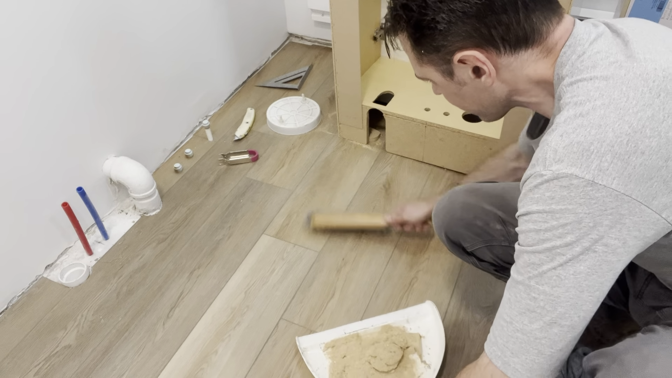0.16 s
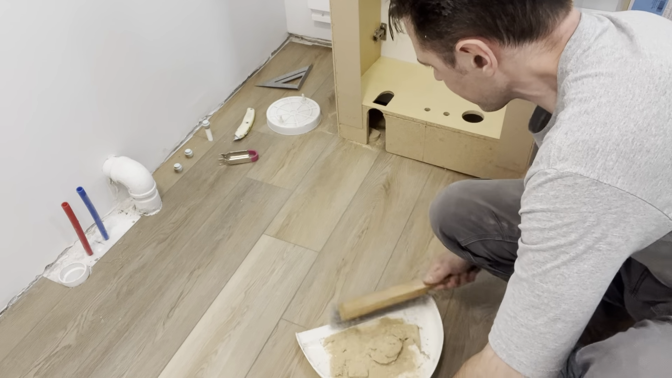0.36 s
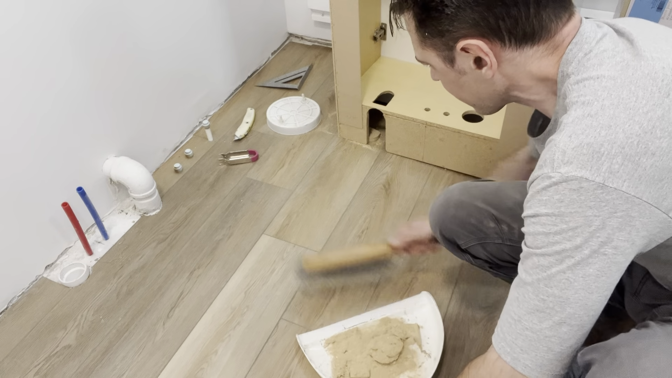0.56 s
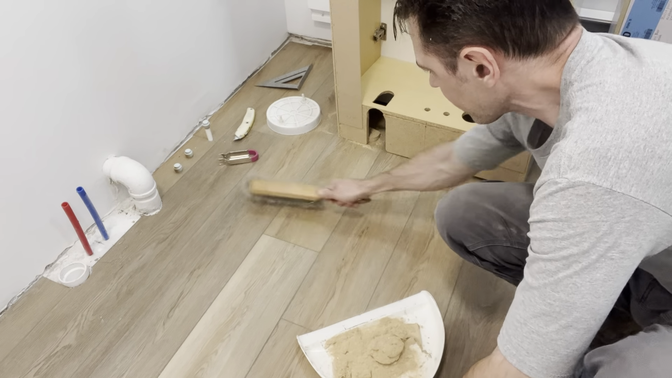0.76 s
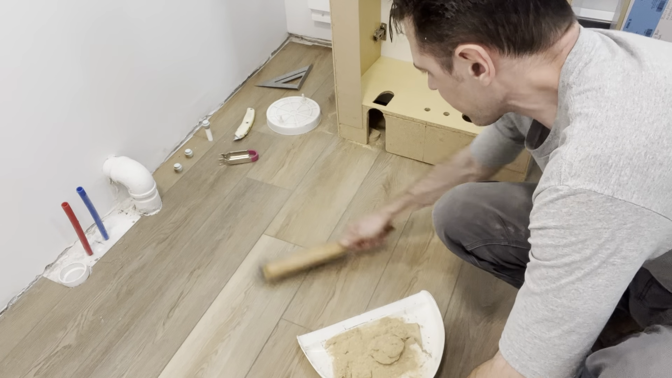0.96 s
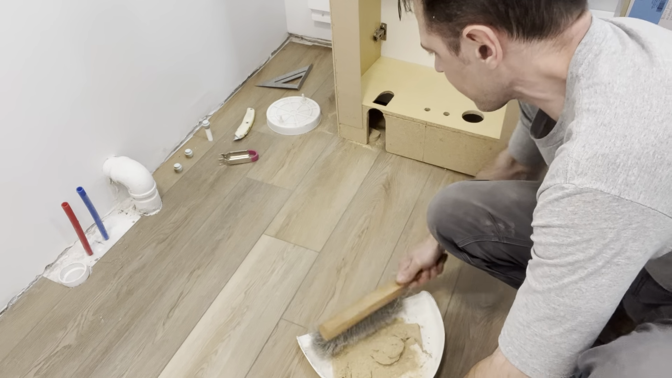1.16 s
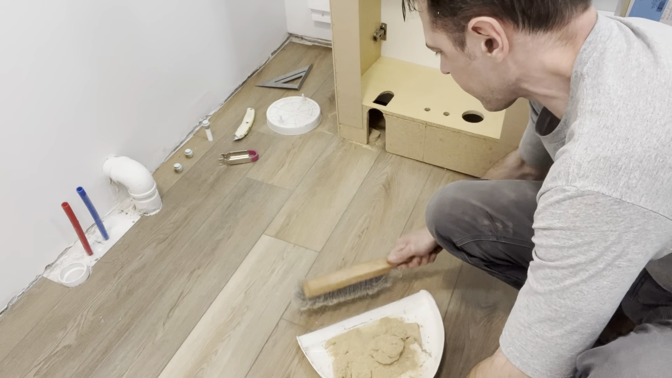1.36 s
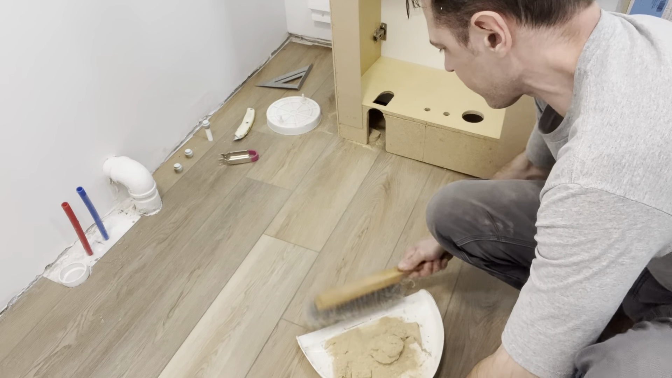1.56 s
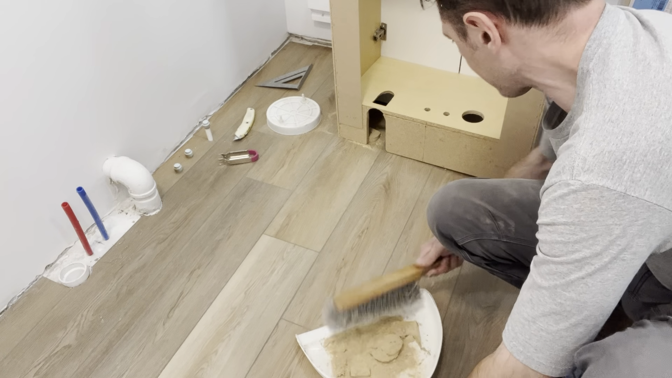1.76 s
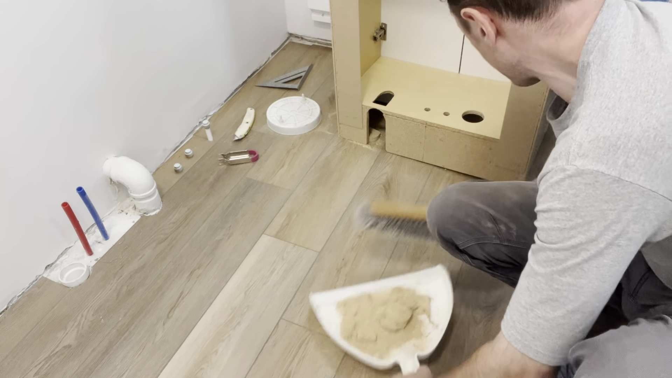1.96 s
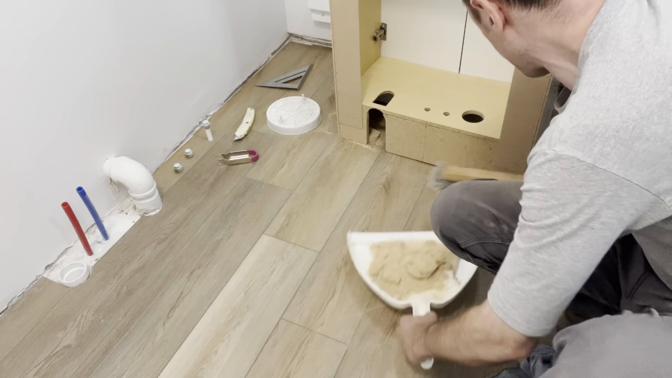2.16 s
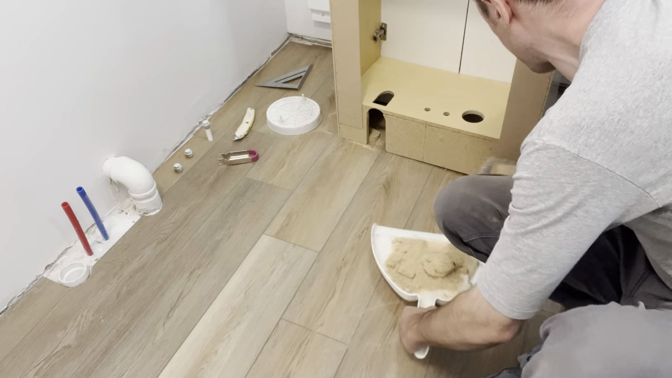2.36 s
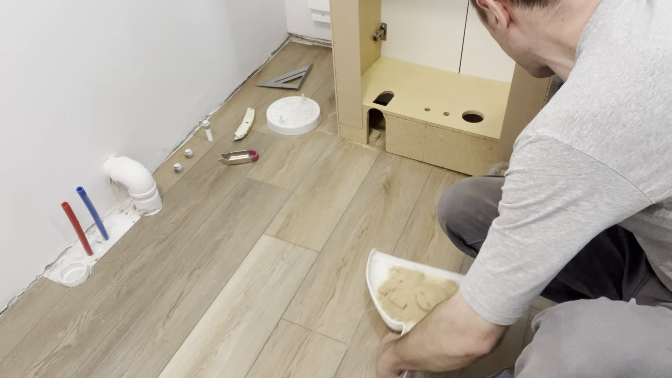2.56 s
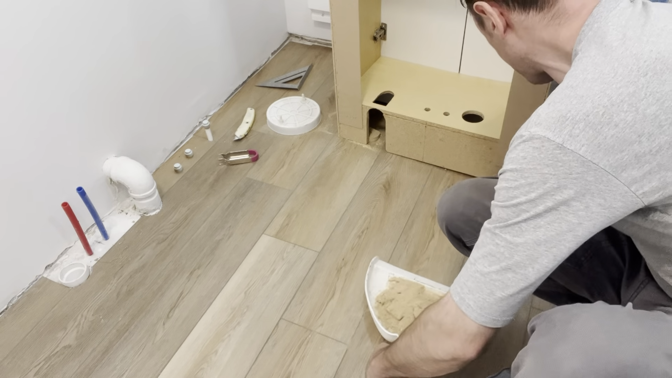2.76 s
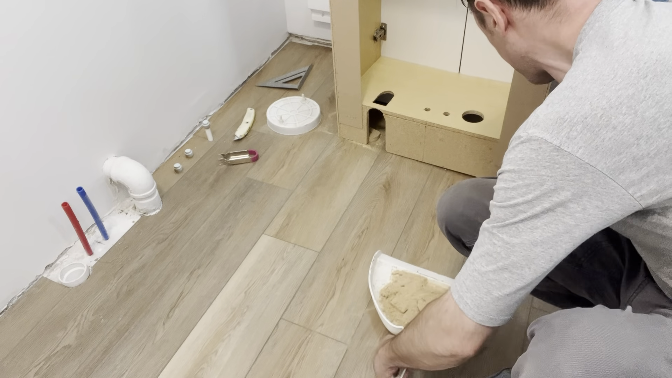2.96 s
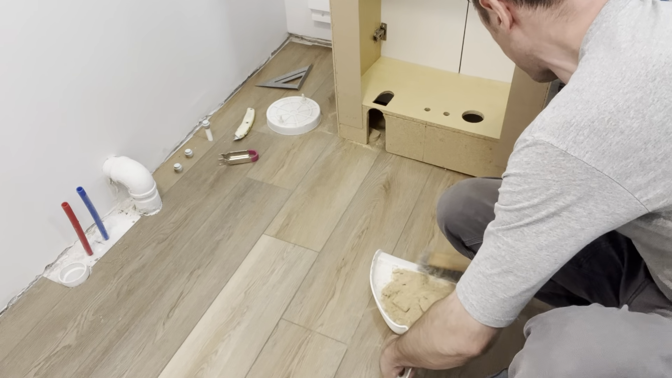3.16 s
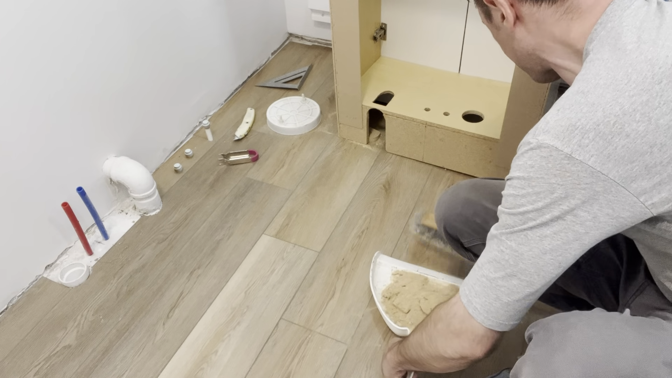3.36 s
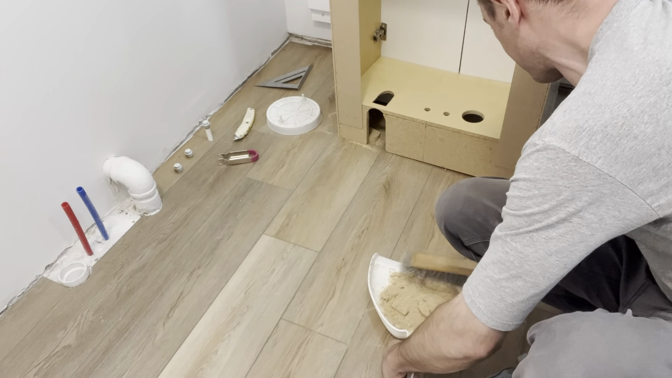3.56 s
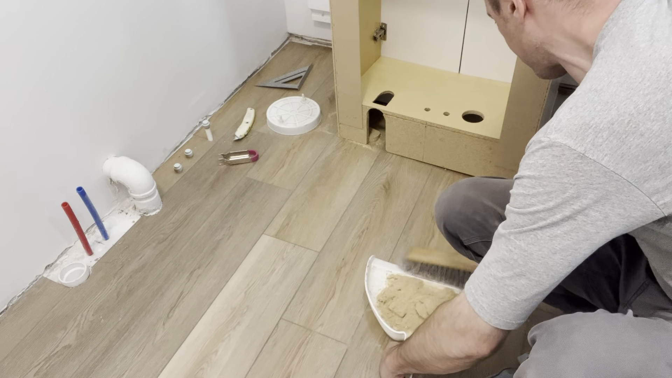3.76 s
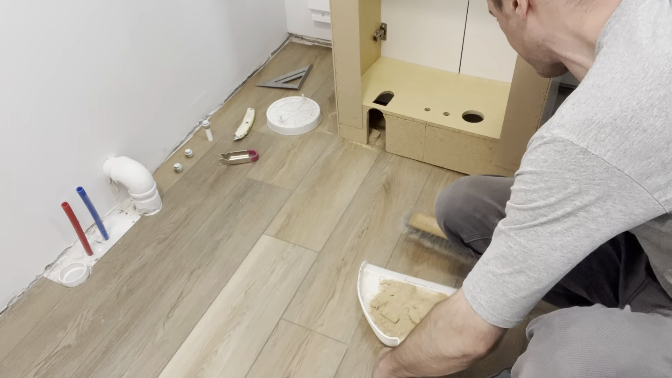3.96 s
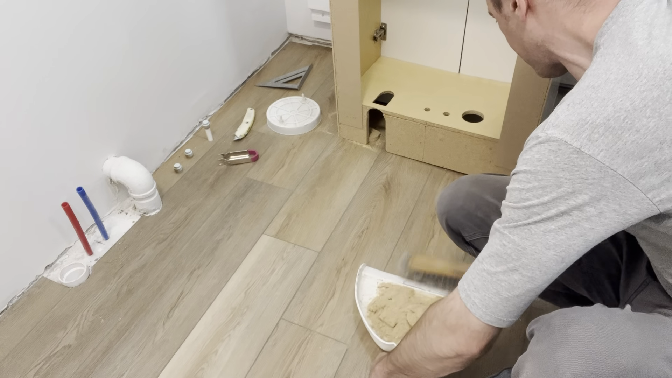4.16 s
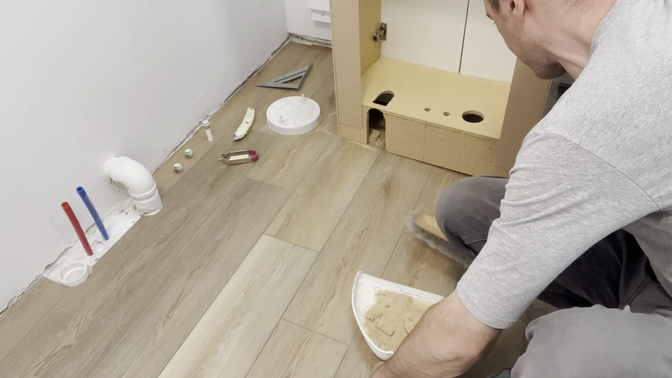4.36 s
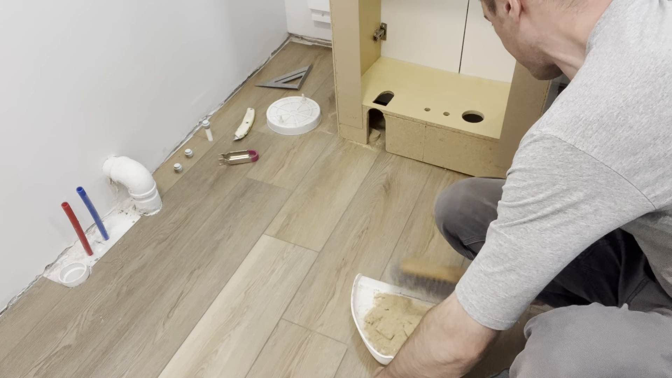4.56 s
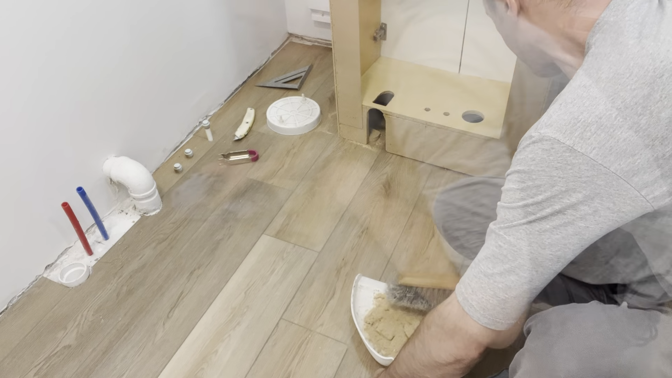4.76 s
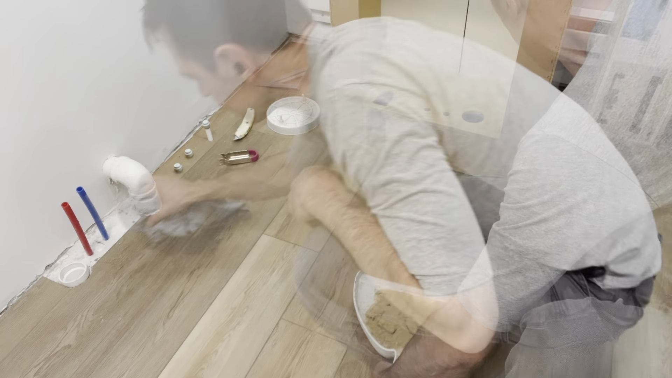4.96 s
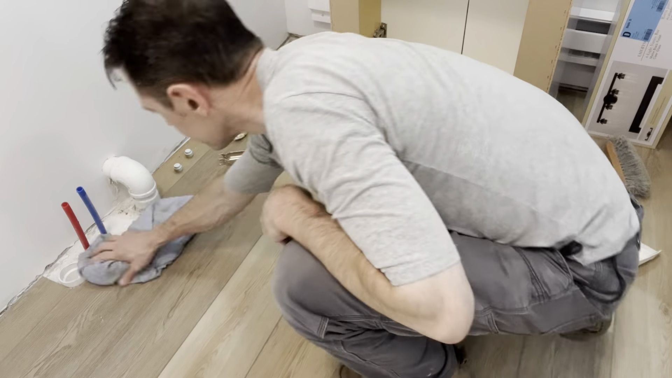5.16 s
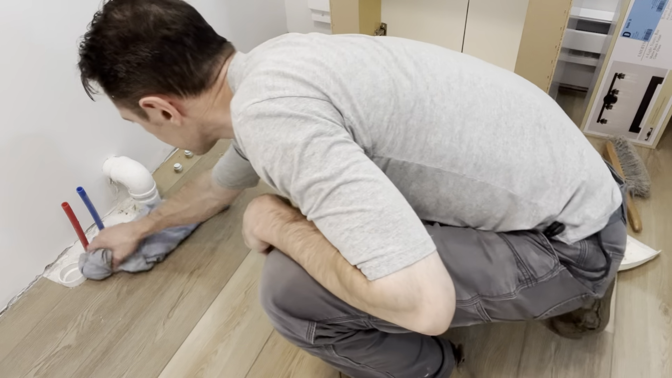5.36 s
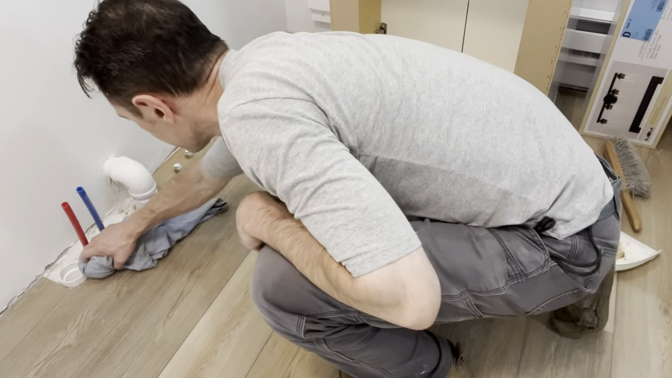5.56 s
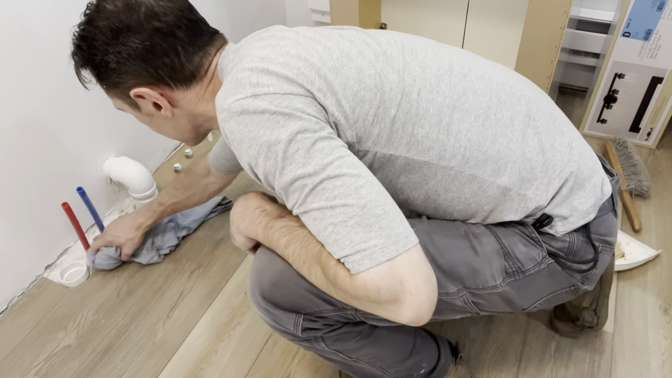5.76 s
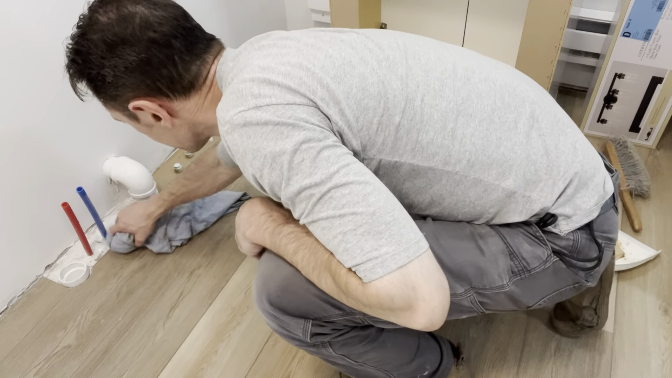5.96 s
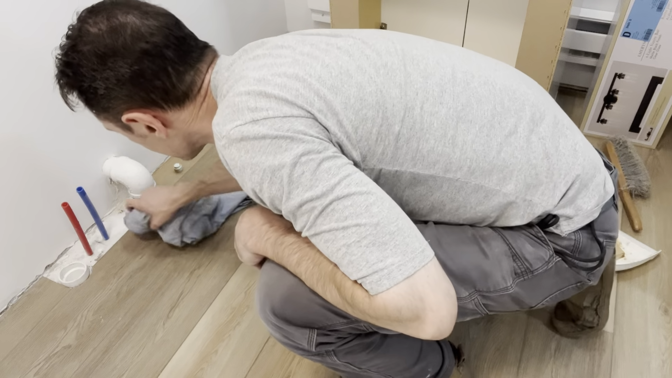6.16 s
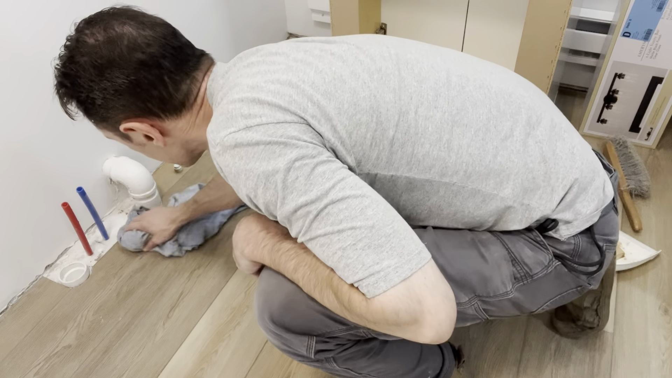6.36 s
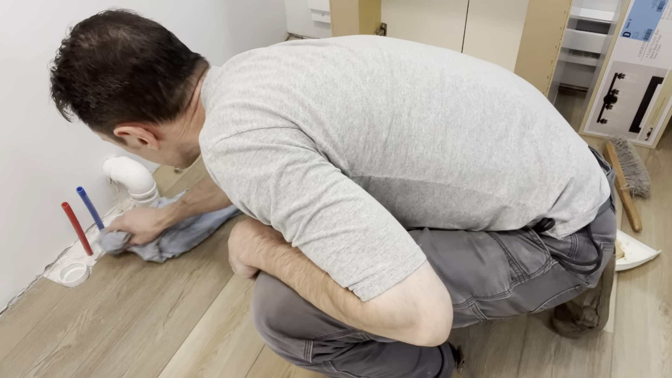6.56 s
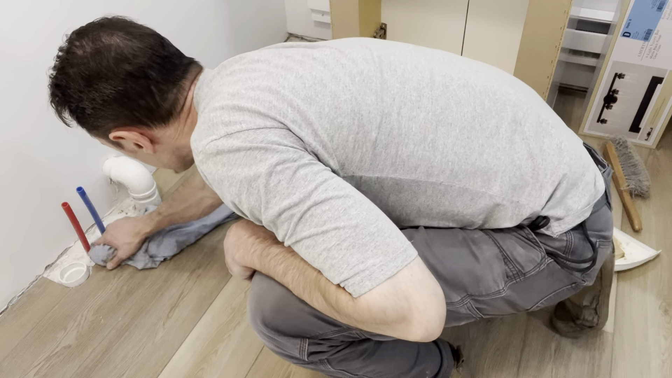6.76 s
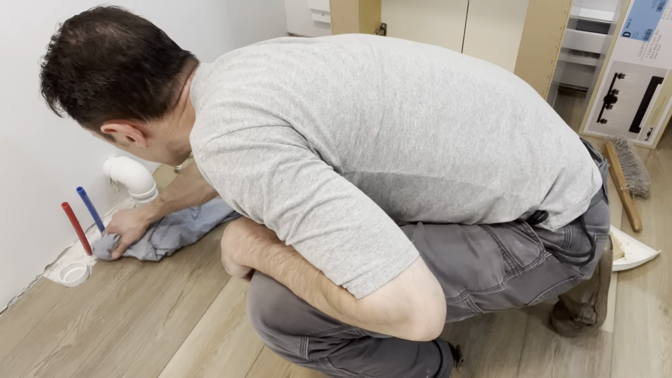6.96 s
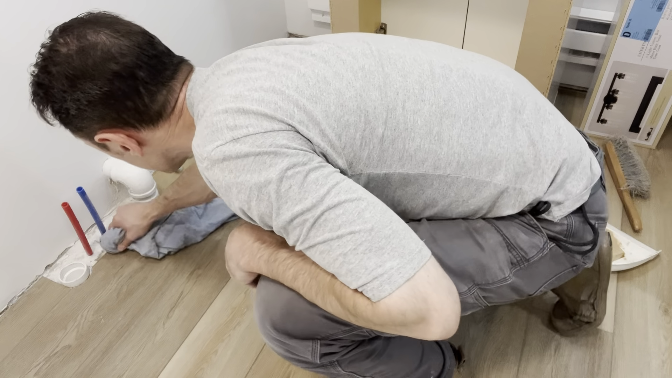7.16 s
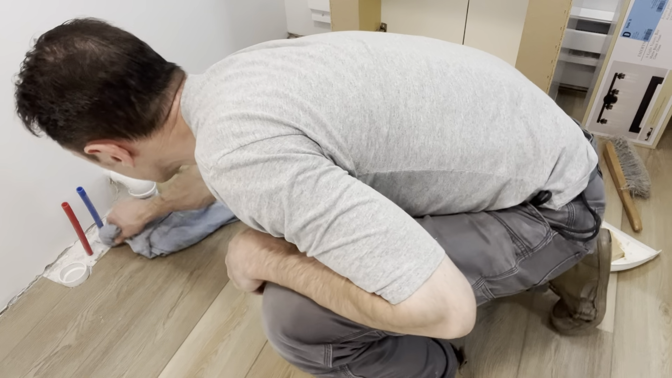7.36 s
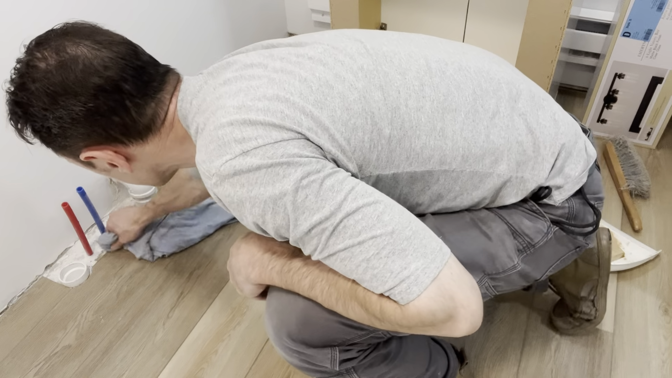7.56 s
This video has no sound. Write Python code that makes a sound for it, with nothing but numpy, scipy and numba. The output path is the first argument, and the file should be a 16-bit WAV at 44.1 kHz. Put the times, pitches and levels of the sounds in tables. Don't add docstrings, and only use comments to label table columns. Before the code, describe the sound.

In a small bare room, a bristle brush sweeps sawdust over laminate toward a plastic dustpan, with long hissing strokes, ringing scrapes and light taps. After a quieter gap the strokes turn short and brisk, with one hard knock and some duller drops. Then knees shuffle and a cloth wipes much more softly, finally rubbing a hollow drain pipe. Close stereo phone pickup, wide texture, faint room hiss.

```python
import sys
import numpy as np
from scipy import signal
from scipy.fft import rfft, irfft
from scipy.io import wavfile
from scipy.ndimage import uniform_filter1d
from numba import njit

SR = 44100
rng = np.random.default_rng(int(sys.argv[2]) if len(sys.argv) > 2 else 0)


def gain_from_db(level_db):
    decades = np.asarray(level_db, float) / 20
    return 10 ** decades


def bounce(signal):
    frames = np.transpose(np.atleast_2d(signal))
    limited = np.clip(frames, -1, 1)
    pcm = np.round(limited * 32767).astype(np.int16)
    wavfile.write(sys.argv[1], SR, pcm)


N = 339570
FREQ = np.arange(N // 2 + 1) * SR / N + 1e-3
TICK = np.arange(N // 20 + 2) * 20 / SR

# land_s, lift_s, peak_db, landing_db, brightness_db
BRUSH_STROKES = [(-.01, 0.354, -45.5, -54, -5), (0.783, 0.997, -48, -58, -3), (0.98, 1.112, -47, -57, -2.5),
                 (1.15, 1.248, -67.5, -63, -8), (1.28, 1.367, -67, -76, -14), (1.406, 1.47, -53, -56, -5.5),
                 (1.624, 1.64, -49.5, -58, -8), (1.718, 1.777, -62.5, -75, -11),
                 (1.96, 2.298, -87.5, -100, -13), (2.629, 2.67, -55.5, -69, -3.5),
                 (2.637, 2.967, -50.5, -63.5, -6), (2.947, 3.064, -51, -56.5, -4.5),
                 (3.062, 3.154, -47.5, -57, -6), (3.26, 3.413, -61.5, -78, -7.5),
                 (3.467, 3.558, -51.5, -57, -5.5), (3.66, 3.747, -56, -70, -8),
                 (3.74, 3.768, -44.5, -42, -12.5), (3.803, 4.024, -52.5, -53.5, -7.5),
                 (4.04, 4.18, -53, -64.5, -2.5), (4.154, 4.315, -51.5, -53.5, -4.5),
                 (4.28, 4.376, -50.5, -56, -6.5), (4.403, 4.444, -51.5, -57, -4),
                 (4.458, 4.491, -47.5, -43.5, -6), (4.682, 4.705, -48.5, -52, -3.5),
                 (4.78, 4.85, -70, -72, -12), (4.858, 4.955, -70.5, -74, -11)]
# land_s, lift_s, peak_db, landing_db, brightness_db
CLOTH_WIPES = [(4.95, 5.09, -74.5, -83, -9), (5.093, 5.166, -65.5, -80, -3.5),
               (5.283, 5.383, -69, -80, -8.5), (5.393, 5.446, -76.5, -74, -3.5),
               (5.566, 5.673, -72.5, -78, -14.5), (5.674, 5.792, -57.5, -68.5, -6),
               (5.802, 5.902, -57, -59, -7.5), (5.88, 5.954, -65.5, -72, -2.5),
               (6.247, 6.273, -67.5, -72, -4.5), (6.3, 6.522, -73.5, -81, -8),
               (6.595, 6.664, -67.5, -73, -5), (6.8, 7.097, -62.5, -86.5, -6), (7.17, 7.3, -65, -69, -7),
               (7.33, 7.45, -69.5, -73, -4), (7.52, 7.604, -62, -81, -4.5)]
# freq_hz, density_db_per_hz
BRISTLE_SPECTRUM = [(300, -19), (600, -6.5), (900, -3), (2000, 1.5), (3500, 1), (5200, -2), (7300, -2.5),
                    (8600, -7.5), (10000, -11.5), (11800, -16.5), (13000, -15.5), (15500, -20.5)]
ROOM_FALL_DB_S, TOP_FALL_DB_S = 135, 169
CLOTH_FALL_DB_S, CLOTH_TOP_FALL_DB_S, PIPE_FALL_DB_S = 85.5, 116, 73
LANDING_S, CLOTH_LANDING_S = 0.0088, 0.024

# land_s, lift_s, peak_db, landing_db, ring_hz
RIM_SCRAPES = [(-.01, .15, -49.5, -43, 1250), (0.159, 0.306, -43.5, -46.5, 1060),
               (.85, 1.03, -65, -82, 1120), (1.315, 1.36, -58.5, -66, 1190), (1.423, 1.6, -75, -52, 1440),
               (1.618, 1.63, -44.5, -69, 1460), (1.73, 1.764, -53.5, -65, 910),
               (1.86, 1.91, -96, -80, 1130), (2.534, 2.656, -68, -86, 864),
               (2.643, 2.686, -45.5, -45, 1000), (2.713, 2.804, -41.5, -57, 1090),
               (2.823, 2.89, -41.5, -46, 1120), (2.87, 3.013, -42.5, -42.5, 1080),
               (3.032, 3.183, -49.5, -49, 980), (3.302, 3.4, -54.5, -62.5, 1300),
               (3.456, 3.56, -54, -54, 1300), (3.664, 3.763, -49, -62, 1300), (3.738, 3.78, -41, -56, 1120),
               (3.805, 3.997, -46.5, -41.5, 1170), (4.023, 4.083, -49, -54, 1210),
               (4.156, 4.34, -48, -57, 1190), (4.397, 4.495, -52.5, -56, 740),
               (4.681, 4.715, -57, -41, 730), (4.85, 4.885, -51.5, -65, 1040),
               (4.91, 4.946, -56.5, -57, 566)]
# land_s, lift_s, peak_db, landing_db, ring_hz
SHUFFLES = [
    (5.08, 5.132, -57.5, -68, 650),
    (5.152, 5.22, -65, -64, 420),
    (5.747, 5.868, -55.5, -76, 810),
    (6.23, 6.282, -59.5, -72, 700),
    (7.202, 7.4, -63, -72, 620),
    (7.412, 7.437, -57, -37, 694),
    (7.556, 7.625, -60, -65, 810),
]
# freq_hz, width_hz, level_db
PAN_MODES = [(484, 34, -2.5), (565, 22, 1), (620, 68, -13), (696.5, 26, -3), (802, 20, 1), (872, 7.3, 1),
             (933.6, 21.5, -1.5), (1057, 39, -3.5), (1103, 8, 0.5), (1199, 86, -1.5), (1250, 27, -3),
             (1300, 8.3, 3.5), (1370, 92, -6.5), (1420, 8.8, 3), (1503, 23, 0), (1600, 21, -1.5),
             (1736, 41, -4.5), (2000, 31, -12), (2310, 84, -2), (2560, 90, -2), (2700, 51, -3),
             (3180, 180, -2)]
CLOTH_RING_DB, CLOTH_RING_HZ = -3, 744
UNDER_RIM_RATIO, UNDER_RIM_DAMP = 0.39, 0.9

# land_s, lift_s, peak_db, landing_db, centre_hz
LIP_WHISTLES = [(-.01, 0.066, -52, -47, 1300), (0.073, 0.144, -49.5, -44, 1340),
                (0.188, .31, -49.5, -46, 1260), (.33, .39, -53.5, -56, 1250), (.42, 0.475, -70, -67, 1250),
                (0.507, 0.587, -70, -70, 1100), (1.31, 1.37, -67.5, -70, 1250),
                (0.888, 0.942, -55.5, -64, 1190), (1.09, 1.144, -59.5, -53, 1430),
                (1.633, 1.68, -52.5, -44, 3040), (1.74, 1.78, -62.5, -73, 2960),
                (1.816, 1.921, -72, -64, 980), (2.952, 3.03, -54, -46, 1260), (3.11, 3.158, -48, -56, 2490),
                (3.332, 3.5, -70, -66, 2580), (3.963, 4.02, -51, -43, 1370),
                (4.154, 4.17, -52.5, -50, 1750), (4.327, 4.397, -53.5, -54, 1160),
                (4.43, 4.47, -56, -56, 1460), (4.453, 4.605, -61.5, -48, 1490),
                (4.682, 4.74, -50.5, -41.5, 1630), (5.76, 5.9, -62.5, -62, 2500)]
# land_s, lift_s, peak_db, landing_db, centre_hz
BELLY_TONES = [(0.104, 0.18, -56.5, -58, 651), (0.186, 0.258, -54.5, -63, 667),
               (0.239, 0.315, -50, -54.5, 911), (1.001, 1.047, -63.5, -53, 940),
               (2.637, 2.695, -59, -41, 800), (2.717, 2.895, -51, -53.5, 930), (2.936, 3.03, -64, -59, 914),
               (3.76, 3.781, -51.5, -36, 694), (3.856, 3.93, -62, -60, 491), (4.284, 4.352, -56, -64, 964),
               (4.425, 4.47, -57, -50, 641), (4.7, 4.73, -56, -54, 725), (4.945, 4.99, -74, -63, 260),
               (5.76, 5.848, -68, -62, 773), (5.86, 5.9, -70, -62, 880), (7.417, 7.457, -62.5, -56, 769)]
LIP_DAMP, BELLY_DAMP = 0.14, 0.043

# freq_hz, density_db_per_hz
RUMBLE_SPECTRUM = [(30, -14), (70, -14), (140, 2), (280, 2), (450, 3.5), (800, -6.5), (1500, -37)]
# start_s, swing_db, jolt_rumble_db
WEIGHT_SHIFTS = [(0.016, -69, -57.5), (0.5, -66, -94.5), (0.8, -69, -63.5), (1.424, -67, -65.5),
                 (1.651, -72, -67.5), (1.79, -80, -69), (2.56, -79, -71), (2.65, -67, -57), (2.8, -80, -61),
                 (2.89, -80, -67), (3.485, -73, -63.5), (3.759, -44.5, -50.5), (4.095, -73, -86),
                 (4.175, -70, -68.5), (4.424, -53, -52.5), (4.705, -49.5, -55), (5.108, -66, -58.5),
                 (5.16, -70, -70), (5.604, -68, -59.5), (5.645, -76, -67), (5.72, -80, -68),
                 (5.8, -76, -67), (6.038, -68, -87), (6.268, -78, -63), (6.3, -72, -71), (6.419, -78, -87),
                 (6.847, -71, -86), (7.079, -67, -64), (7.425, -65, -55.5), (7.519, -80, -74)]
# freq_hz, level_db
BOARD_MODES = [
    (69, 13),
    (58.7, -5),
    (120.4, -10.5),
]
SCRAPE_RUMBLE_DB, BRUSH_RUMBLE_DB, CLOTH_RUMBLE_DB = -25, -38, -10
RUMBLE_UNDER_HZ, RUMBLE_DB_PER_OCTAVE = 1110, 70
JOLT_FALL_DB_S, JOLT_LEAD_S, THUMP_T60_S = 157, 0.0088, 0.18
CLOTH_SCENE_S = 5
STILL_RUMBLE_DB, CLOTH_SCENE_RUMBLE_DB = -89.5, -72.5
STILL_SWAY_DB, CLOTH_SCENE_SWAY_DB = -89.5, -74.5

# freq_hz, density_db_per_hz
AIR_SPECTRUM = [(15, -68), (25, -37), (49, -3), (91, -2.5), (133, -6.5), (183, -8), (253, -4), (297, -6.5),
                (359, -6.5), (614, -15), (4040, -18), (15500, -35)]
# freq_hz, density_db_per_hz
LEFT_HISS_SPECTRUM = [(300, -20), (1200, 3), (7300, -5), (8800, -24.5)]
HUSH_DB = -69.5

# start_s, blow_db, low_hz, high_hz, high_part_db
TAPS = [(1.349, -54, 1300, 2950, -2), (1.409, -60, 1440, 1960, -12), (1.445, -48, 1370, 2870, -16),
        (1.632, -37.5, 1447, 2310, 0), (1.645, -41, 1210, 1726, 0), (1.664, -44, 1240, 1880, 13),
        (1.7, -42.5, 1420, 2350, 7), (2.678, -33, 1160, 3220, -22), (2.695, -58, 1110, 2570, -17),
        (3.473, -53, 1360, 2680, -12), (3.7453, -31.5, 1250, 1600, 8), (3.7475, -21.5, 1217, 1690, -6.5),
        (3.7522, -31, 1250, 1690, -14), (3.762, -34.5, 1340, 2700, 13), (4.16, -42, 1750, 1300, 0),
        (4.873, -62.5, 1050, 1400, -10), (4.895, -55, 1095, 800, 1), (1.488, -56, 1330, 1900, -13),
        (1.196, -53, 2700, 1400, -15), (6.944, -64, 1020, 1500, -12), (2.724, -45, 1077, 1480, -11),
        (2.746, -44, 1185, 1480, -17), (2.836, -46, 920, 1330, -3), (2.92, -51, 1200, 925, -8),
        (3.933, -55, 1210, 905, -4), (4.014, -47, 1464, 1930, -13), (4.022, -43.5, 1370, 1890, -14),
        (4.23, -47, 1310, 1020, -15)]
# start_s, blow_db, low_hz, high_hz, high_part_db
DROPS = [(0.79, -56.5, 830, 1540, 3), (1.769, -54, 684, 1080, -13), (2.638, -41.5, 800, 1000, -1),
         (4.4145, -37.5, 670, 1087, -4), (4.43, -42, 634, 1044, -8), (4.6865, -49, 606, 1250, -2),
         (4.6905, -34.5, 726, 1265, 1), (4.702, -38.5, 662, 1303, -1), (4.707, -38, 713, 1270, 3),
         (5.102, -64, 470, 1020, 1), (5.6, -72, 300, 520, -6), (6.258, -72, 328, 700, -6),
         (6.275, -56.5, 720, 1080, -6), (7.414, -53, 381, 1215, -6), (7.45, -56, 342, 1820, -9)]
# start_s, blow_db, low_hz, high_hz, high_part_db
HANDLE_KNOCKS = [
    (1.325, -60.5, 722, 1300, -8),
    (1.413, -53, 765, 1600, 0),
    (1.634, -45, 713, 3050, 8),
    (1.672, -62, 887, 2970, 2),
    (3.756, -38, 551, 2097, 5),
]
TAP_T60_S, DROP_T60_S, HANDLE_T60_S = 0.036, 0.068, 0.13
HARD_DAMP_PER_DB = 0.1
PUSH_S, PUSH_PER_DB, FOCUS_PER_DB = 0.0015, 0.35, 0.6
ROOM_T60_S, ROOM_DB, EARLY_T60_S, EARLY_DB = 0.34, 0.5, 0.0075, -6

# land_s, lift_s, peak_db, landing_db
PIPE_RUBS = [
    (6.8, 6.94, -61.5, -88),
    (6.95, 6.98, -62, -68),
    (7.0, 7.05, -55.5, -64),
    (7.06, 7.11, -61, -66),
    (7.15, 7.24, -56, -54.5),
    (7.25, 7.3, -69, -56),
    (7.32, 7.37, -60.5, -64),
    (7.41, 7.47, -59.5, -59),
    (7.55, 7.61, -59.5, -60),
    (7.62, 7.7, -62, -72),
]
# land_s, lift_s, peak_db, landing_db
PIPE_RIM_RUBS = [
    (6.86, 6.97, -67, -74),
    (7.0, 7.2, -69, -74),
    (7.2, 7.45, -67, -72),
    (7.47, 7.7, -69.5, -75),
]
# freq_hz, width_hz, level_db
PIPE_AIR_MODES = [(322, 88, -2), (376, 30, 4.5), (467, 20, 1.5), (800, 300, -17), (1600, 130, -16)]
# freq_hz, width_hz, level_db
PIPE_RIM_MODES = [(2320, 85, 2.5), (4750, 250, 0), (2910, 70, 0), (6470, 300, -4.5)]

# freq_hz, share_0_to_1
PORT_LIKENESS = [(60, 0.6), (150, 0.49), (330, 0.46), (700, 0.26), (1120, 0.4), (1700, 0.15), (3000, 0.25),
                 (4500, 0.05), (5700, 0.1), (6700, 0.6), (7700, 0.88), (8500, 0.96), (10800, 0.97),
                 (15500, 0.96)]
# freq_hz, left_minus_right_db
PORT_LEAN = [(60, 6), (130, -0.5), (400, 2), (1100, 0.5), (2400, 2), (4000, .5), (5600, -0.5), (7300, 2),
             (8600, 0)]
PORT_TURN_HZ, PORT_ZERO_HZ = 5080, 700
TOP_HZ = 15800


def on_freq(table):
    hz, value = np.transpose(table)
    return np.interp(np.log(FREQ), np.log(hz), value)


def shape(x, gain):
    return irfft(rfft(x) * gain, N)


def resonances(modes):
    total = 0
    for k, (hz, width_hz, db) in enumerate(modes):
        detune = (FREQ / hz - hz / FREQ) * hz / width_hz
        total = total + (-1) ** k * gain_from_db(db) / (1 + 1j * detune)
    return total


def unit(x, lo_hz, hi_hz):
    band = shape(x, (FREQ > lo_hz) & (FREQ < hi_hz))
    return x / np.sqrt(np.mean(band ** 2))


def walk(rate_hz):
    hold = int(SR / rate_hz)
    steps = np.repeat(rng.standard_normal(N // hold + 1), hold)
    return 4.5 * uniform_filter1d(uniform_filter1d(steps, hold), hold)[:N]


def grit(rate_hz, spread_db, bed):
    size = (rng.random(N) < rate_hz / SR) * gain_from_db(spread_db * rng.exponential(size=N))
    slips = np.abs(uniform_filter1d(size, size=24)) ** 0.5
    slips = slips / np.sqrt(np.mean(slips ** 2))
    return rng.standard_normal((3, N)) * (np.clip(bed, 0, 1) + slips)


@njit
def svf(x, hz, damp):
    y, band, low = np.empty(len(x)), 0., 0.
    for i in range(len(x)):
        g = np.tan(np.pi * hz[i] / SR)
        v = (band + g * (x[i] - low)) / (1 + g * (g + damp))
        band, low, y[i] = 2 * v - band, low + 2 * g * v, damp * v
    return y


def ring(hz, gains, t60_s, t):
    modes = gains[:, None] * np.sin(2 * np.pi * hz[:, None] * t)
    return modes.sum(0) * 1000 ** (-t / max(t60_s, 0.005))


def echoes(t60_s):
    t = np.arange(SR) / SR
    tail = rng.standard_normal((3, SR)) * 1000 ** (-t / t60_s) * (t > 0.003)
    return tail / np.linalg.norm(tail[0])


def strokes(rows, fall_db_s, landing_s=LANDING_S):
    land_s, lift_s, peak_db, landing_db = np.array(rows).T[:4, :, None]
    progress = np.clip((TICK - land_s) / np.maximum(lift_s - land_s, 0.002), 0, 1)
    db = landing_db + (peak_db - landing_db) * np.sin(np.pi / 2 * progress)
    db = db - fall_db_s * np.maximum(TICK - lift_s, 0)
    return gain_from_db(2 * db) * np.clip((TICK - land_s) / landing_s, 0, 1) ** 2


def in_time(power):
    return np.interp(np.arange(N) / SR, TICK, 10 * np.log10(power + 1e-11))


def centre(power, hz):
    power = power + 1e-14
    return np.interp(np.arange(N) / SR, TICK, hz @ power / power.sum(0))


def background_step(still_db, cloth_scene_db):
    change = np.clip((TICK - CLOTH_SCENE_S) / 0.18 + 0.5, 0, 1)
    return gain_from_db(2 * (still_db + (cloth_scene_db - still_db) * change))


def contacts():
    brush = strokes(BRUSH_STROKES, ROOM_FALL_DB_S).sum(0)
    cloth = strokes(CLOTH_WIPES, CLOTH_FALL_DB_S, CLOTH_LANDING_S).sum(0)
    hiss_db = in_time(brush + cloth)

    brush_top = strokes(BRUSH_STROKES, TOP_FALL_DB_S)
    cloth_top = strokes(CLOTH_WIPES, CLOTH_TOP_FALL_DB_S, CLOTH_LANDING_S)
    brightness_db = np.array(BRUSH_STROKES + CLOTH_WIPES)[:, 4]
    top = gain_from_db(2 * brightness_db) @ np.r_[brush_top, cloth_top]

    rims = strokes(RIM_SCRAPES + SHUFFLES, ROOM_FALL_DB_S)
    rims = np.r_[rims, [cloth * gain_from_db(2 * CLOTH_RING_DB)]]
    rim_hz = np.r_[np.array(RIM_SCRAPES + SHUFFLES)[:, 4], CLOTH_RING_HZ]

    tilt_octaves = np.maximum(np.log2(rim_hz / RUMBLE_UNDER_HZ), 0)
    flat_db = SCRAPE_RUMBLE_DB - RUMBLE_DB_PER_OCTAVE * tilt_octaves
    jolt_rows = [(s - JOLT_LEAD_S, s, db, db + 15) for s, _, db in WEIGHT_SHIFTS]
    boards = strokes(jolt_rows, JOLT_FALL_DB_S).sum(0) + gain_from_db(2 * flat_db) @ rims
    boards = boards + gain_from_db(2 * BRUSH_RUMBLE_DB) * brush + gain_from_db(2 * CLOTH_RUMBLE_DB) * cloth
    boards = boards + background_step(STILL_RUMBLE_DB, CLOTH_SCENE_RUMBLE_DB)
    return hiss_db, in_time(top) - hiss_db, in_time(rims.sum(0)), in_time(boards) - hiss_db, centre(rims, rim_hz)


def fibre_hiss(bright_db):
    comb = 1 + gain_from_db(-5.5) * rfft(echoes(0.069), N)
    hiss = shape(grit(2500, 3.5, 1.0), gain_from_db(on_freq(BRISTLE_SPECTRUM)) * comb)
    top = shape(hiss, 1 / (1 + (8200 / FREQ) ** 12))
    body_gain = gain_from_db(-0.6 * np.clip(bright_db + 8.0, -8, 8)) - 1
    body = shape(hiss, 1 / (1 + (FREQ / 3500) ** 4)) * body_gain
    low = unit(hiss - top + body, 2600, 6800) * gain_from_db(0.3 * walk(14))
    return low + unit(top, 9660, 12450) * gain_from_db(bright_db - 1.5 + 0.15 * walk(15))


def pan_scrape(grains, pan_db, centre_hz):
    pan = shape(grains, resonances(PAN_MODES))
    pan = np.array([svf(svf(path, centre_hz, 0.71), centre_hz, 1.64) for path in pan])
    pan = pan - np.array([svf(path, UNDER_RIM_RATIO * centre_hz, UNDER_RIM_DAMP) for path in pan])
    return unit(pan, 600, 2100) * gain_from_db(pan_db - 2.0 + 0.35 * walk(40))


def pan_tone(grains, rows, damp):
    power = strokes(rows, ROOM_FALL_DB_S)
    hz = centre(power, np.array(rows)[:, 4])
    tone = np.array([svf(svf(path, hz, damp), hz, 2 * damp) for path in grains])
    return unit(tone * np.sqrt(1500 / hz), 200, 4000) * gain_from_db(in_time(power.sum(0)))


def board_rumble(board_db):
    drag = shape(grit(400, 1.2, 0.9), gain_from_db(on_freq(RUMBLE_SPECTRUM)))
    return unit(drag, 98, 780) * gain_from_db(board_db - 1.0 + 0.35 * walk(12))


def rubbing():
    hiss_db, bright_db, pan_db, board_db, centre_hz = contacts()
    floor = gain_from_db(hiss_db + 2.0) * (fibre_hiss(bright_db) + board_rumble(board_db))
    grains = grit(500, 0.45, 0.99)
    pan = pan_scrape(grains, pan_db, centre_hz)
    lip = pan_tone(grains, LIP_WHISTLES, LIP_DAMP)
    belly = pan_tone(grains, BELLY_TONES, BELLY_DAMP)
    return floor + pan + lip + belly


def hush():
    air = unit(shape(rng.standard_normal((3, N)), gain_from_db(on_freq(AIR_SPECTRUM))), 20, 16000)
    air = air * gain_from_db(0.12 * walk(3.3))
    own = unit(shape(rng.standard_normal(N), gain_from_db(on_freq(LEFT_HISS_SPECTRUM))), 20, 16000)
    return gain_from_db(HUSH_DB) * (gain_from_db(-4.0) * ports(air) + gain_from_db(0.5) * own * np.array([[1], [0]]))


def thumps():
    t, out = np.arange(SR) / SR, np.zeros(N + SR)
    hz, mode_db = np.transpose(BOARD_MODES)
    for start_s, swing_db, _ in WEIGHT_SHIFTS:
        swing = ring(hz, gain_from_db(mode_db), THUMP_T60_S, t)
        swing = swing + ring(hz[:1], gain_from_db(mode_db[:1] - 34.0), 2.4 * THUMP_T60_S, t)
        swing = swing * (1 - np.exp(-t / 0.015)) ** 2
        start = int(start_s * SR)
        out[start:start + len(t)] += gain_from_db(swing_db) * swing / np.abs(swing).max()
    sway = unit(shape(rng.standard_normal((3, N)), resonances([(55.6, 175, 0)]) ** 2), 16, 180)
    sway_db = in_time(background_step(STILL_SWAY_DB, CLOTH_SCENE_SWAY_DB)) + 0.7 * walk(5.3)
    return out[:N] + sway * gain_from_db(sway_db)


def blow(blow_db, low_hz, high_hz, high_db, t60_s, t):
    pan_hz = np.array(PAN_MODES)[:, 0]
    t60_s = t60_s * np.exp(-HARD_DAMP_PER_DB * max(blow_db + 40.5, 0))
    size, side = rng.standard_normal((2, len(pan_hz)))
    struck = gain_from_db(-12.0 + 2.3 * size) * np.sign(side)
    struck = struck * gain_from_db(-FOCUS_PER_DB * max(blow_db + 48.0, 0))
    low_gains = struck * gain_from_db(-110 * np.log2(pan_hz / low_hz) ** 2)
    high_gains = struck * gain_from_db(-14 * np.log2(pan_hz / high_hz) ** 2)
    low = ring(np.r_[low_hz, pan_hz], np.r_[1, low_gains], t60_s, t)
    high = ring(np.r_[high_hz, pan_hz], np.r_[0.7, high_gains], 1.12 * t60_s, t)
    push_s = PUSH_S * gain_from_db(PUSH_PER_DB * max(blow_db + 35, 0))
    body = (1 - np.exp(-t / push_s)) ** 2 * (low + gain_from_db(high_db) * high)
    crack = signal.lfilter([1, -1], [1], rng.standard_normal(len(t))) * np.exp(-t / 0.0066)
    return gain_from_db(blow_db) * (body / np.abs(body).max() + gain_from_db(high_db - 20.5) * crack)


def knocks():
    t, out = np.arange(SR // 4) / SR, np.zeros(N + SR)
    for rows, t60_s in ((TAPS, TAP_T60_S), (DROPS, DROP_T60_S), (HANDLE_KNOCKS, HANDLE_T60_S)):
        for start_s, blow_db, low_hz, high_hz, high_db in rows:
            start = int(start_s * SR)
            out[start:start + len(t)] += blow(blow_db, low_hz, high_hz, high_db, t60_s, t)
    early = gain_from_db(EARLY_DB) * rfft(echoes(EARLY_T60_S), N)
    late = gain_from_db(ROOM_DB) * rfft(echoes(ROOM_T60_S), N)
    return shape(out[:N], 1 + early + late)


def pipe():
    air_db = in_time(strokes(PIPE_RUBS, PIPE_FALL_DB_S).sum(0))
    rim_db = in_time(strokes(PIPE_RIM_RUBS, PIPE_FALL_DB_S).sum(0))
    grains = grit(400, 1.8, 0.75)
    air = unit(shape(grains, resonances(PIPE_AIR_MODES)), 250, 570)
    rim = unit(shape(grains, resonances(PIPE_RIM_MODES) ** 2), 2000, 5200)
    return air * gain_from_db(air_db - 1.0 + 0.35 * walk(30)) + rim * gain_from_db(rim_db)


def ports(paths):
    share = np.clip(on_freq(PORT_LIKENESS), 0, 1)
    turns = (FREQ - np.minimum(FREQ, PORT_ZERO_HZ)) / PORT_TURN_HZ
    lag = np.array([np.ones_like(FREQ), np.exp(-2j * np.pi * turns)])
    heard = shape(paths[0], lag * np.sqrt(share)) + shape(paths[1:], np.sqrt(1 - share))
    return shape(heard, gain_from_db(on_freq(PORT_LEAN) * np.array([[0.5], [-0.5]])))


def scene():
    return ports(rubbing() + thumps() + knocks() + pipe()) + hush()


def band_limit(x):
    return signal.sosfilt(signal.butter(12, 15840, fs=SR, output="sos"), x)


def record(dry):
    low_pass = signal.ellip(10, 0.2, 60, TOP_HZ, fs=SR, output="sos")
    high_pass = signal.butter(2, 36.0, "high", fs=SR, output="sos")
    mix = signal.sosfilt(high_pass, signal.sosfilt(low_pass, dry))
    return band_limit(mix)


dry = scene()
out = record(dry)
bounce(out)
```